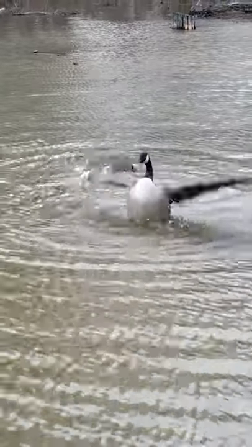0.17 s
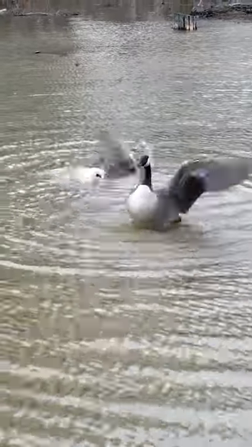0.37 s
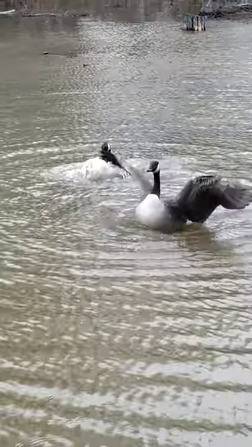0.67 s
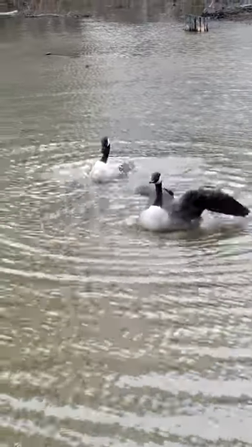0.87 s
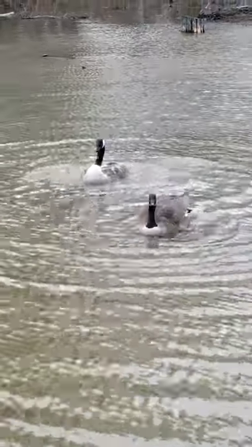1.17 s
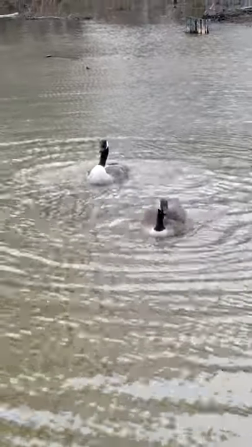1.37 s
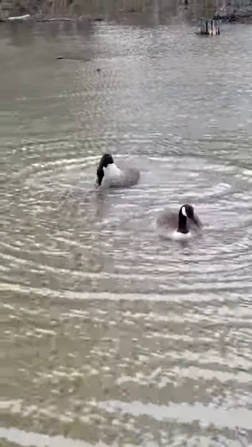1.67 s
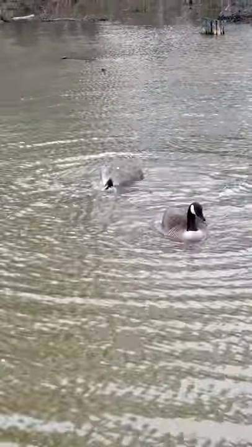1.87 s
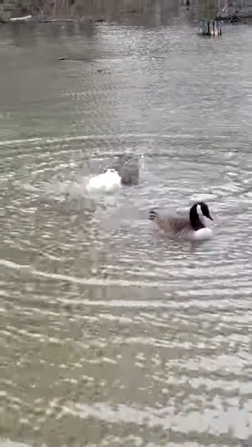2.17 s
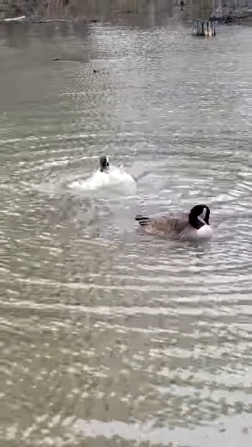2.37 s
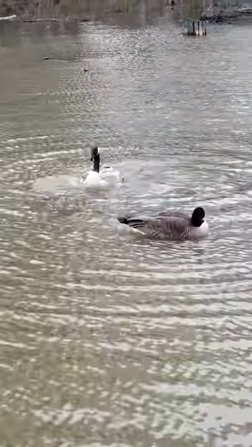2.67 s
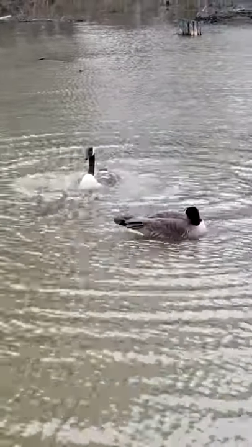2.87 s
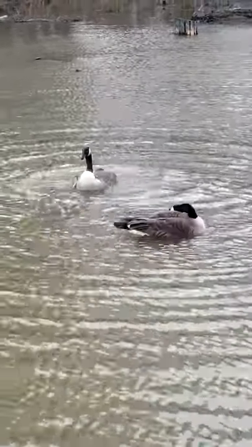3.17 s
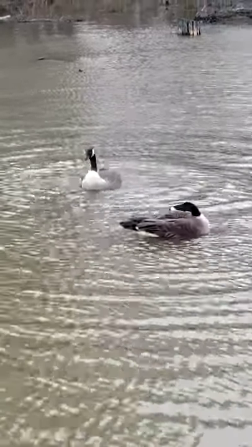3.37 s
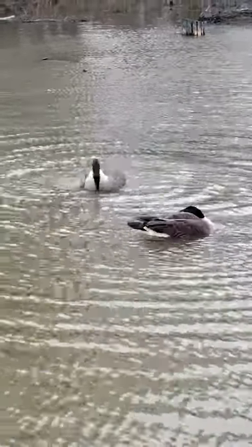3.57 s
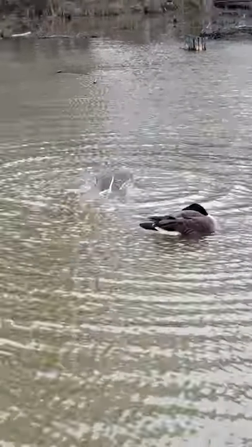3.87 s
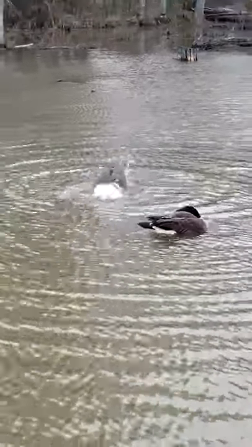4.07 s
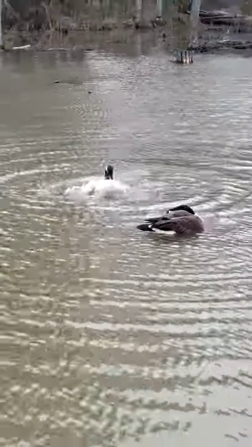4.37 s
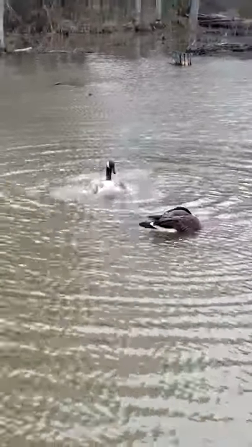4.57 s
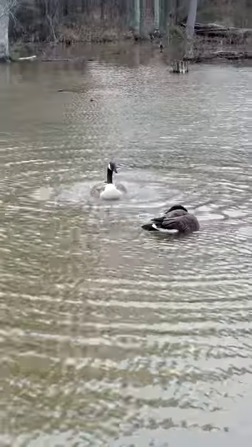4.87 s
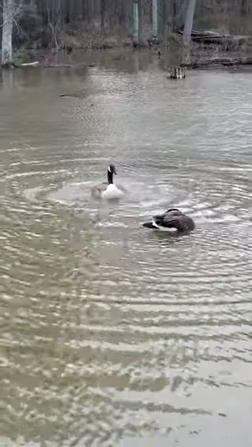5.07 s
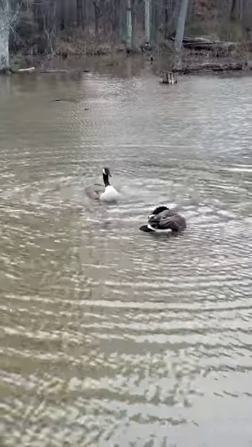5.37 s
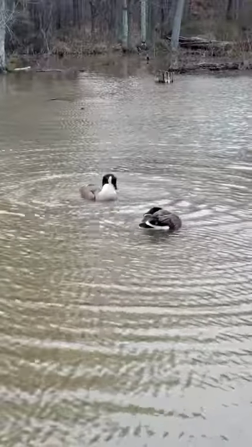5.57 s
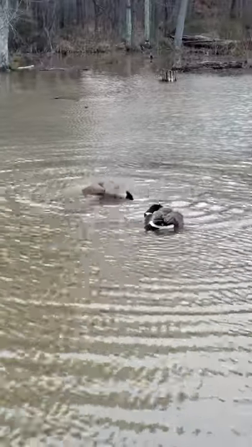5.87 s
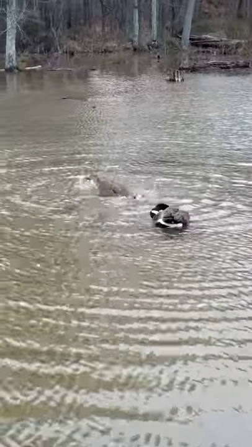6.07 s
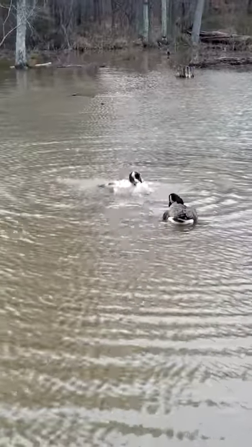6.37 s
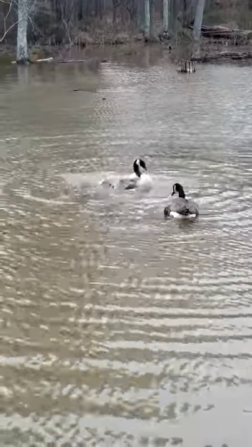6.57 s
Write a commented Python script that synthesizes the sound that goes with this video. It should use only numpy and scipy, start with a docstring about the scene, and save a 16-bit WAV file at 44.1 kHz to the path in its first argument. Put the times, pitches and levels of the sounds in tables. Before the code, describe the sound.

A dense, steady chorus of small frogs peeps at high pitch throughout. Two geese bathe a few metres off: wing thrashing and splashing open the scene, then return in short bouts with bubbly plops and fine spray. Between bouts the water calms, faint bird whistles pass, and wind rumbles and knocks softly on the handheld stereo microphone, outdoors by a wooded pond.

```python
"""Geese bathe in a flooded wood: bubbles and hissing noise make churned water, from the first moment.
All along, many small frogs peep near 3 kHz as short rising tones over a wash of filtered noise.
From about 1.5 s the breeze rumbles harder on the right port and gliding whistles come from far songbirds.
New bouts of wing beats splash near 0.3, 2.1, 4 and 6.1 s; soft noise knocks crowd the left port near 3 s.
A bright drip patters near 5.3 s, and the last splashes end among thumps of wind, made of noise swells."""
import sys
import numpy as np
from scipy import signal
from scipy.fft import rfft, irfft, next_fast_len
from scipy.io import wavfile

SR = 44100
rng = np.random.default_rng(int(sys.argv[2]) if len(sys.argv) > 2 else 0)


def file_out(sig):
    """Save sig as 16-bit WAV at sys.argv[1]."""
    # one column per channel
    cols = np.atleast_2d(sig).T
    # limit, then scale
    lim = np.clip(cols, -1, 1)
    pcm = np.round(lim * 32767).astype(np.int16)
    wavfile.write(sys.argv[1], SR, pcm)


N = 296352
TIME = np.arange(N) / SR   # seconds

# single slaps and plops on the water: (time [s], level [dB], decay [s])
SLAPS = [(0.514, -39, 0.005), (0.802, -49.5, 0.009), (1.926, -42.5, 0.0072), (2.463, -48.5, 0.027),
         (2.8846, -43, 0.0088), (4.075, -44, 0.0039), (6.285, -46, 0.0087), (6.372, -50, 0.0057),
         (6.583, -40, 0.0085)]
# heavy wing strokes that throw a sheet of water: (time [s], level [dB], half-width [s])
WING_STROKES = [(0.182, -58, 0.065), (.41, -57, 0.018), (0.533, -52, 0.006), (2.164, -54.5, 0.022),
                (2.331, -62, 0.0067), (2.55, -57, 0.015), (4.058, -57.5, 0.01), (4.489, -53.5, 0.035),
                (6.294, -50.5, 0.024), (6.379, -51.5, 0.0074), (6.59, -56, 0.047)]
# drops flicked up by a dipping or shaken head: (time [s], level [dB])
HEAD_DIPS = [(1.91, -69), (3.8, -78), (3.86, -74), (5.885, -77), (1.08, -80), (2.83, -79)]
# wing beats fanning the air: (time [s], level [dB])
WING_BEATS = [(.01, -46), (.31, -50)]
# tone of the churned water: (frequency [Hz], relative level [dB])
SPLASH_COLOUR = [(200, -21), (400, -7), (900, 1.5), (1250, -4.5), (1600, -5.5), (2100, 4.5), (3000, -5.5),
                 (3900, -4), (5000, -23.5), (7500, -39.5), (9000, -57.5)]
# tone of the flying spray: (frequency [Hz], relative level [dB])
SPRAY_COLOUR = [(3500, -3), (4500, 3.5), (5800, 7.5), (6800, 0.5), (7700, 1), (8400, -30), (9700, -30),
                (11000, -7.5), (12600, 3), (14000, -0.5), (16000, -51.5)]
# how far the left port leads for sound from the birds: (frequency [Hz], phase [radians])
BIRD_PORT_PHASE = [(0, 0.5), (950, 0.95), (1550, 6), (2240, 1.5), (3100, 9.5), (3800, 7), (5700, 0)]
CHURN_UNEVEN_DB = 2.6
# spray hangs in the air and falls back after the wings have stopped
SPRAY_DB, SPRAY_RISE_S, SPRAY_FALL_S = -16.5, 0.18, 0.23
SPRAY_LEAD_S = 0.15   # the first drops fly as the bird ducks, before the wings hit
STROKE_SPRAY_DB = -19.5   # relative to the stroke


def geese():
    """Churned water under the wings, sharp slaps, the spray that follows, and fanned air."""
    strokes = sum(from_db(db) * swell(s, width_s) for s, db, width_s in WING_STROKES)
    churn = bouts(attack_s=0.0092, release_s=0.083) + strokes
    churn = churn * from_db(CHURN_UNEVEN_DB * drift(45))
    for s, db, decay_s in SLAPS:
        at, age = int(s * SR), TIME[:SR // 10]
        slap = (1 - np.exp(-age / 0.00018)) * np.exp(-age / decay_s)
        churn[at:at + len(age)] += from_db(db) * slap

    thrown = from_db(SPRAY_DB) * bouts(SPRAY_RISE_S, SPRAY_FALL_S, SPRAY_LEAD_S)
    thrown = thrown + from_db(STROKE_SPRAY_DB) * strokes
    flicked = sum(from_db(db) * swell(s, width_s=0.018) for s, db in HEAD_DIPS)

    bubbles = water(per_s=2200, cycles=22, spread_db=4.2, hiss_db=-7, low_hz=450, high_hz=5500)
    drops = water(per_s=2500, cycles=8, spread_db=4.4, hiss_db=1, low_hz=3500, high_hz=14000)
    splash = churn * lead(rms_one(colour(bubbles, SPLASH_COLOUR)), BIRD_PORT_PHASE) * pan(2.2)
    spray = (thrown + flicked) * rms_one(colour(drops, SPRAY_COLOUR)) * pan(-4)

    beats = sum(from_db(db) * swell(s, width_s=0.07) for s, db in WING_BEATS)
    air_colour = [(50, -8.5), (130, -2.0), (260, -4.5), (600, -13.0), (1500, -56)]
    whoosh = beats * rms_one(colour(stereo_noise(alike=1.0), air_colour))
    scatter = from_db(-11.5) * woods(splash + spray, t60=0.35)
    return splash + spray + whoosh + scatter


# bouts of wings thrashing the water: (start time [s], length [s], level [dB])
WING_BOUTS = [(-.2, 0.19, -47.5), (0.326, 0.53, -53), (2.132, .46, -52), (4.011, 0.51, -52),
              (6.134, 0.39, -54)]


def bouts(attack_s, release_s, lead_s=0):
    """Strength of the thrashing: each bout builds up, holds and dies away."""
    level = 0
    for s, length_s, db in WING_BOUTS:
        rise = np.clip((TIME - s + lead_s) / attack_s, 0, 1) ** 2
        fall = np.exp(-np.maximum(TIME - s - length_s, 0) / release_s)
        level = level + from_db(db) * rise * fall
    return level


def water(per_s, cycles, spread_db, hiss_db, low_hz, high_hz):
    """Drops trap bubbles of all sizes that ring briefly, over the hiss of tearing water."""
    clicks = grains(per_s, spread_db)
    dealt = rng.integers(0, 32, N)   # which of 32 bubble sizes each click sets ringing
    bubbles = 0
    for k, hz in enumerate(np.geomspace(low_hz, high_hz, 32)):
        ringing = ring(clicks * (dealt == k), hz, cycles / hz)
        bubbles = bubbles + rms_one(ringing) * np.sqrt(hz)
    hiss = rms_one(colour(stereo_noise(alike=0), [(high_hz, 0), (2 * high_hz, -12)]))
    return rms_one(rms_one(bubbles) + from_db(hiss_db) * hiss)


# big bubbles trapped as a bird plunges or the water settles:
# (time [s], starting pitch [Hz], level [dB])
BIG_BUBBLES = [(.385, 836, -42), (.824, 913, -50), (1.06, 630, -48), (1.11, 825, -52.5), (1.44, 840, -49),
               (2.193, 962, -38), (3.704, 1280, -49.5), (4.035, 900, -37.5), (4.106, 1025, -43),
               (4.31, 890, -41.5), (6.167, 938, -41), (6.19, 793, -42), (6.244, 932, -36.5),
               (6.38, 860, -44)]


def plunges(decay_s=0.0097, rise_per_s=2.5):
    """A large bubble rings and rises in pitch as it nears the surface."""
    out, age = np.zeros(N), TIME[:SR // 12]
    for s, hz, db in BIG_BUBBLES:
        at = int(s * SR)
        phase = 2 * np.pi * hz * (age + rise_per_s * age ** 2 / 2)
        fade = np.exp(-age / decay_s) * (1 - np.exp(-age / 0.00026))
        out[at:at + len(age)] += from_db(db) * np.sin(phase) * fade
    return lead(out * pan(3), BIRD_PORT_PHASE) + from_db(-5.0) * woods(out, t60=0.2)


# lone bright drips: (time [s], level [dB])
DRIPS = [(5.335, -61), (1.3, -64)]


def drips():
    """Water running off the feathers makes a brief, bright patter of filtered noise."""
    level = sum(from_db(db) * swell(s, width_s=0.011) for s, db in DRIPS)
    bright = [(2500, -29), (3700, 1), (4400, 0), (5200, -21.5), (7000, -32), (10000, -59.5)]
    return level * rms_one(colour(stereo_noise(alike=0.43), bright))


# strength of the frog chorus: (time [s], level [dB])
CHORUS_LEVEL = [(0, -39), (.4, -42.5), (3, -43.5), (4.5, -44.5), (6.72, -43)]
# tone of the far wash of frogs: (frequency [Hz], relative level [dB])
CHORUS_COLOUR = [(2000, -50), (2300, -33), (2500, -12.5), (2650, -13), (2800, -5), (2950, 1.5),
                 (3100, -4.5), (3220, -5.5), (3350, -17.5), (3500, -33), (3900, -63.5)]
PEEP_ROUGH_DB, WOODS_T60_S = 3, 0.77


def frogs():
    """Nearer frogs stand out as single, slightly rough peeps; the farthest merge into a wash."""
    calls = peeps()
    calls = calls * from_db(PEEP_ROUGH_DB * drift(140))
    near_colour = [(2400, -0.5), (2700, -6.0), (2950, -2), (3300, -6)]
    near = rms_one(colour(calls + 0.4 * woods(calls, WOODS_T60_S), near_colour))

    wash = rms_one(colour(stereo_noise(alike=0.31), CHORUS_COLOUR))
    far = lead(wash, [(0, -7.5), (2400, 0.9), (3100, 2.5), (3450, 4.5)])
    level = from_db(np.interp(TIME, *np.transpose(CHORUS_LEVEL)))
    return level * (0.8 * near + 0.6 * far)


FROG_COUNT, FROG_PITCH_HZ, FROG_SPREAD_HZ = 110, 3042, 115
PEEP_S, PEEP_PERIOD_S = 0.08, 0.7   # each frog's own pace varies around this period
PEEP_GLIDE = 0.1   # share of the top pitch missing at the start of a peep


def peeps():
    """Each frog repeats a rising peep at its own pitch, pace and direction; every call varies a little."""
    out, age = np.zeros((2, N + SR)), np.linspace(0, 1, int(PEEP_S * SR))
    shape = np.sqrt(age * (1 - age))
    frog_traits = rng.standard_normal((FROG_COUNT, 5))
    call_traits = rng.standard_normal((FROG_COUNT, 16, 3))
    for (pitch, distance, pace, start, bearing), calls in zip(frog_traits, call_traits):
        ear_phase = np.array([[0], [1.82 + 1.02 * bearing]])   # the right side's lag, radians
        for k, (late, sharp, effort) in enumerate(calls):
            at = int((k + start % 1 + late / 10) * PEEP_PERIOD_S * from_db(pace) * SR)
            if 0 <= at < N:
                top_hz = FROG_PITCH_HZ + FROG_SPREAD_HZ * np.clip(pitch + sharp / 2, -3, 1.6)
                hz = top_hz * (1 - PEEP_GLIDE * (1 - age) ** 1.498)
                phase = 2 * np.pi * np.cumsum(hz) / SR - ear_phase
                level = from_db(2 * np.clip(distance + effort, -3, 1.5))
                out[:, at:at + len(age)] += np.sin(phase) * shape * level
    return out[:, len(age):N + len(age)]   # begin with calls already under way


# songbird notes: (time [s], length [s], start pitch [Hz], end pitch [Hz], level before blurring [dB])
SONG_NOTES = [(1.548, 0.073, 1420, 1360, -71.5), (1.83, .06, 1530, 1480, -67),
              (2.075, 0.065, 1470, 1390, -67), (2.234, 0.056, 2310, 2350, -49.5),
              (2.331, 0.019, 5320, 5180, -56.5), (2.371, .1, 4880, 4830, -67),
              (2.376, .55, 4610, 4610, -64.5), (2.802, 0.88, 4630, 4600, -76),
              (3.087, .14, 2030, 2000, -71.5)]


def songbird():
    """A few thin, wavering whistles, blurred by the trees."""
    out, wobble = np.zeros(N), 1 + 0.015 * drift(300)
    for s, length_s, start_hz, end_hz, db in SONG_NOTES:
        at, along = int(s * SR), np.linspace(0, 1, int(length_s * SR))
        hz = (start_hz + (end_hz - start_hz) * along) * wobble[at:at + len(along)]
        whistle = np.sin(2 * np.pi * np.cumsum(hz) / SR)
        out[at:at + len(along)] += from_db(db) * np.sin(np.pi * along) * whistle
    direct = 0.55 * out * from_db(8.1 * drift(60))   # the direct sound flickers
    return direct + woods(out, t60=0.95)


# rumble of the breeze, mostly on the right port: (time [s], level [dB])
BREEZE_RIGHT = [(0, -55), (1.4, -51.5), (1.6, -40.5), (2.3, -51), (2.8, -47.5), (3.5, -49.5), (4.5, -55.5),
                (5.2, -47.5), (5.6, -50.5), (6.3, -50.5), (6.72, -38)]
# tone of the rumbling bed: (frequency [Hz], relative level [dB])
RUMBLE_COLOUR = [(20, -28), (35, -4), (55, 3), (100, -4), (150, -9), (250, -21.5), (500, -25.5),
                 (1000, -70.5)]
# eddies that thump the ports: (time [s], level [dB], left over right [dB], half-width [s])
EDDIES = [(1.524, -39.5, -35, 0.026), (1.661, -29.5, -4.5, 0.014), (1.715, -29, -1.5, 0.011),
          (2.148, -32, -42, 0.015), (2.548, -18, -12, 0.014), (2.77, -38, -34, 0.017),
          (3.051, -25, -10, 0.013), (3.197, -32, -24, 0.026), (3.381, -42, -23, 0.05),
          (3.719, -31.5, -39, 0.011), (3.823, -34.5, -31, 0.024), (4.642, -37.5, -19, .014),
          (5.419, -24.5, -9, 0.013), (6.016, -33, -34, 0.037), (6.243, -24.5, -38, 0.007),
          (6.349, -30, -35, 0.025), (6.485, -32.5, -33, .018), (6.564, -30.5, -26, 0.015),
          (6.633, -34.5, 1, 0.042), (6.708, -20, 4, .016)]
# tone of the eddies: (frequency [Hz], relative level [dB])
EDDY_COLOUR = [(20, -18), (40, -10.5), (60, 7), (110, 0.5), (200, -10.5), (350, -16.5), (650, -49.5),
               (1000, -45), (2000, -78.5)]


def rumble():
    """Turbulence on the ports: a low bed, and single eddies that swell and pass."""
    bed = rms_one(colour(stereo_noise(alike=0), RUMBLE_COLOUR))
    out = bed * breeze(BREEZE_RIGHT) * pan(-36.0)
    eddy_noise = colour(stereo_noise(alike=0), EDDY_COLOUR)
    for s, db, balance_db, width_s in EDDIES:
        eddy = eddy_noise * swell(s, width_s)
        eddy = eddy / np.abs(eddy).max(axis=1, keepdims=True)
        out += eddy * from_db(db) * pan(balance_db)
    return out


# flutter of the breeze, mostly on the left port: (time [s], level [dB])
BREEZE_LEFT = [(0, -70), (.7, -70), (1.4, -61.5), (2.7, -52), (2.95, -45), (4.2, -51.5), (4.55, -66),
               (5.25, -59), (5.45, -52), (6.03, -53.5), (6.12, -62.5), (6.19, -44.5), (6.72, -67)]
# tone of the flutter and knocks: (frequency [Hz], relative level [dB])
FLUTTER_COLOUR = [(80, -21), (200, -31.5), (330, 3.5), (480, 0), (700, -9.5), (1000, -19.5), (1400, -30.5),
                  (2200, -51.5), (4000, -67)]
# soft knocks at the left port: (time [s], level [dB])
KNOCKS = [(0.919, -45), (2.1, -37.5), (2.799, -47), (2.889, -31), (2.989, -38.5), (3.069, -34),
          (3.208, -32.5), (3.433, -45.5), (3.619, -31.5), (3.661, -37.5), (3.776, -35.5), (3.835, -37),
          (4.42, -41), (5.496, -41), (5.731, -41), (6.342, -31), (6.383, -37), (6.515, -36), (6.687, -36)]
EDDY_FLUTTER_DB = -28.5   # flutter that an eddy stirs up, relative to the eddy's level


def flutter(knock_s=0.0031, hollow_hz=430):
    """Irregular soft puffs and knocks, coloured by the hollow behind the left port."""
    puffs = np.array([grains(per_s=340, spread_db=4.0) for side in range(2)])
    stirred = sum(from_db(db + EDDY_FLUTTER_DB) * swell(s, width_s) for s, db, _, width_s in EDDIES)
    level = breeze(BREEZE_LEFT) * pan(13.3) + stirred
    out = rms_one(colour(puffs, FLUTTER_COLOUR)) * level
    for s, db in KNOCKS:
        at, age = int(s * SR), TIME[:SR // 20]
        push = age / knock_s * np.exp(1 - age / knock_s)
        thud = colour(rng.standard_normal(len(age)) * push, FLUTTER_COLOUR)
        hz = hollow_hz * from_db(rng.normal())   # each knock at a slightly different pitch
        tone = 0.5 * push * np.sin(2 * np.pi * hz * age)
        knock = thud / np.abs(thud).max() + tone
        out[:, at:at + len(knock)] += knock[:N - at] * from_db(db) * pan(23)
    return out


def breeze(rows):
    """Slow strength of the wind with quick random gusts on it."""
    gusts_db = 2 * drift(16)
    return from_db(np.interp(TIME, *np.transpose(rows)) + gusts_db)


# tone of the still air over the water: (frequency [Hz], relative level [dB])
AIR_COLOUR = [(30, -8), (100, -5.5), (350, 10.5), (700, -7.5), (1200, -17), (2000, -17.5), (3500, -11.5),
              (4500, -12.5), (5000, -25), (5900, -23), (7000, -53), (9500, -41.5), (12500, -22),
              (15600, -20)]


def still_air(level_db=-57):
    """A steady, faint bed of filtered noise."""
    return from_db(level_db) * rms_one(colour(stereo_noise(alike=0.078), AIR_COLOUR))


def woods(x, t60):
    """Scatter from the trunks: a diffuse tail, different on each side, falling 60 dB in t60 seconds."""
    tail = rng.standard_normal((2, SR)) * from_db(-60 * TIME[:SR] / t60)
    tail /= np.sqrt(np.sum(tail ** 2, axis=1, keepdims=True))
    return signal.fftconvolve(np.atleast_2d(x), tail, axes=1)[:, :N]


def lead(x, phase):
    """Hold the right side back by a phase that depends on frequency."""
    hz, radians = np.transpose(phase)
    turn = np.exp(-1j * np.interp(np.arange(N // 2 + 1) * SR / N, hz, radians))
    return np.array([x[0], irfft(rfft(x[1]) * turn, N)])


def pan(db):
    """Left and right gains whose mean is 1; positive dB makes the left louder."""
    gains = from_db(np.array([[db], [-db]]) / 2)
    return gains / gains.mean()


def swell(s, width_s):
    """A bell-shaped rise and fall around a moment."""
    return np.exp(-0.5 * ((TIME - s) / width_s) ** 2)


def drift(rate):
    """Smooth random wandering of unit RMS, with `rate` new random values a second."""
    knots = np.arange(0, N / SR + 1, 1 / rate)
    return rms_one(np.interp(TIME, knots, rng.standard_normal(len(knots))))


def grains(per_s, spread_db):
    """Random clicks, many small and a few large."""
    sizes = from_db(spread_db * np.minimum(rng.exponential(1, N), 4))
    return sizes * rng.choice([-1, 1], N) * (rng.random(N) < per_s / SR)


def ring(clicks, hz, t60):
    """Each click sets a sine ringing that falls 60 dB in t60 seconds."""
    r, w = from_db(-60 / (t60 * SR)), 2 * np.pi * hz / SR
    return signal.lfilter([0, np.sin(w)], [1, -2 * r * np.cos(w), r * r], clicks + 1e-18)


def stereo_noise(alike):
    """White noise with a given left-right correlation."""
    mid, side = rng.standard_normal((2, N))
    alike = np.clip(alike, -1, 1)
    return rms_one(np.sqrt(1 + alike) * mid + np.sqrt(1 - alike) * side * [[1], [-1]])


def colour(x, points):
    """Causal (minimum-phase) filter with the given (Hz, dB) response."""
    size = 2 * next_fast_len(x.shape[-1] // 2 + 4096)
    hz, db = np.transpose(points)
    bins = np.maximum(np.arange(size // 2 + 1) * SR / size, 1)
    gain = from_db(np.interp(np.log(bins), np.log(hz), db))
    # folding the cepstrum forward in time gives the minimum-phase response
    cepstrum = irfft(np.log(gain))
    cepstrum[1:size // 2] *= 2
    cepstrum[size // 2 + 1:] = 0
    return irfft(rfft(x, size) * np.exp(rfft(cepstrum)))[..., :x.shape[-1]]


def from_db(db):
    """Turn decibels into a plain gain."""
    return 10 ** (np.asarray(db) / 20)


def rms_one(x):
    """Scale a sound to an RMS level of 1."""
    return x / np.sqrt(np.mean(x ** 2) + 1e-20)


def scene():
    """Birds and frogs over still air, with the breeze close by."""
    birds = geese() + plunges() + drips()
    wind = rumble() + flutter()
    return birds + frogs() + songbird() + wind + still_air()


def record(dry, cutoff_hz=15750):
    """The top is cut steeply and the ends are eased."""
    ease = np.clip(np.minimum(TIME, TIME[-1] - TIME) / 0.003, 0, 1)
    steep = signal.ellip(12, 0.1, 80, cutoff_hz, fs=SR, output="sos")
    return signal.sosfilt(steep, dry * ease)


dry = scene()
out = record(dry)
file_out(out)
```